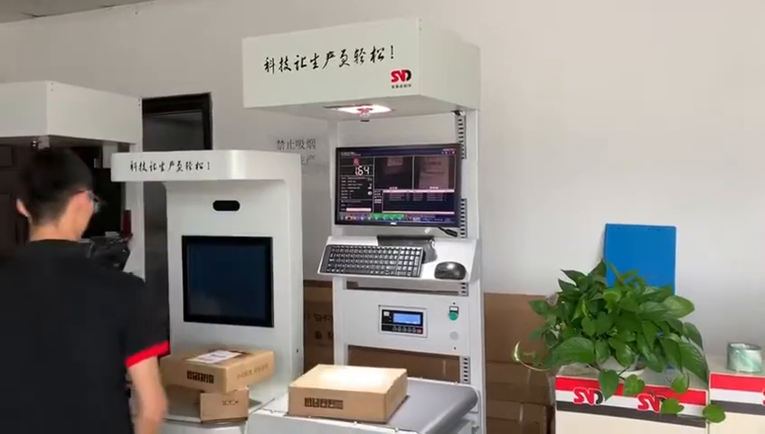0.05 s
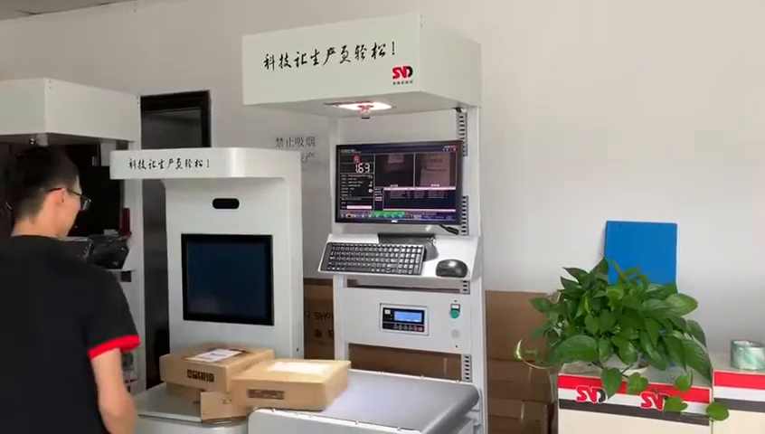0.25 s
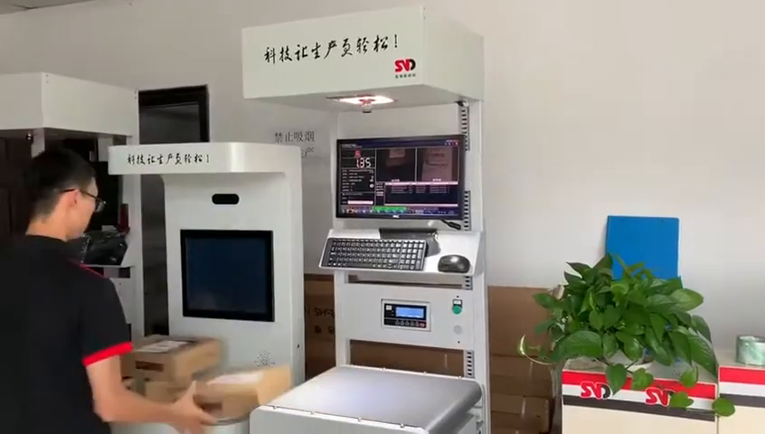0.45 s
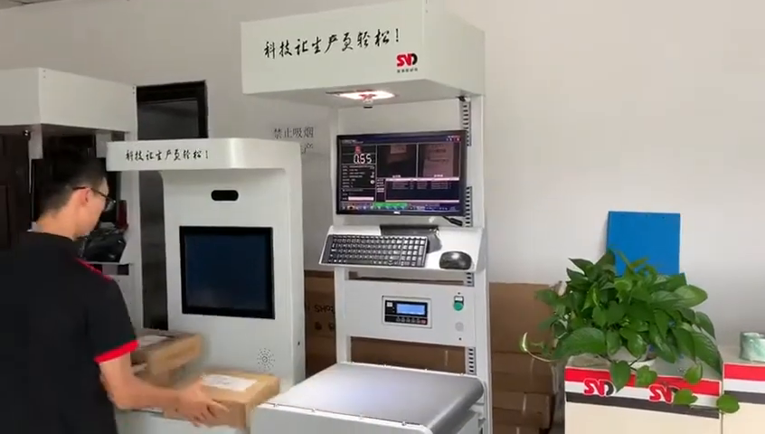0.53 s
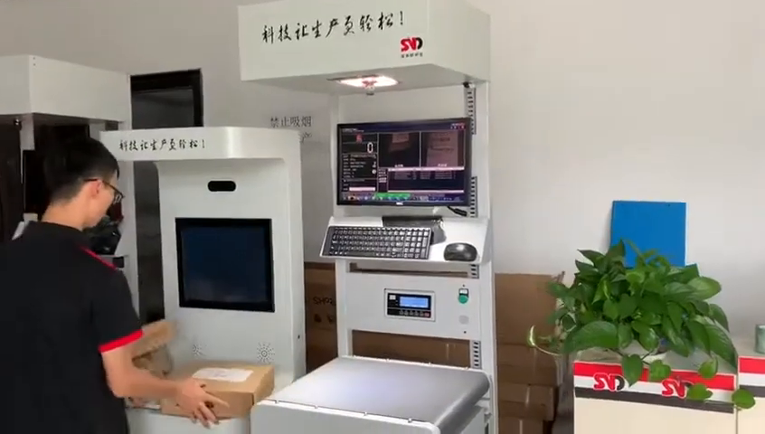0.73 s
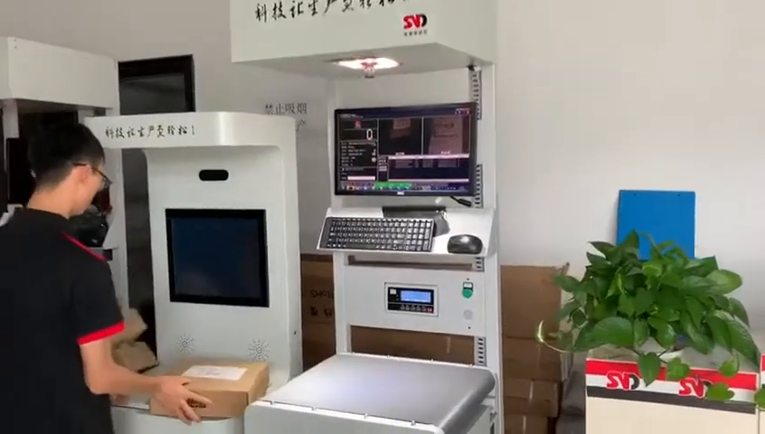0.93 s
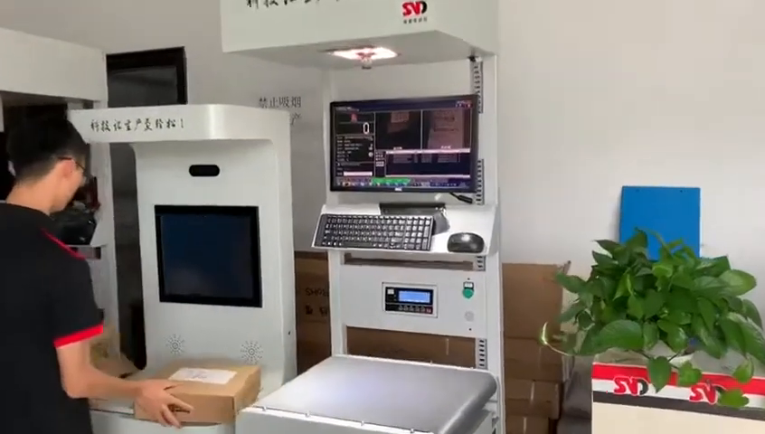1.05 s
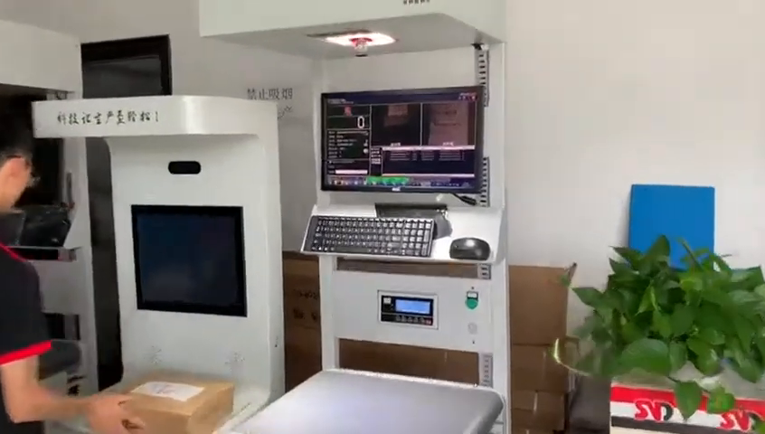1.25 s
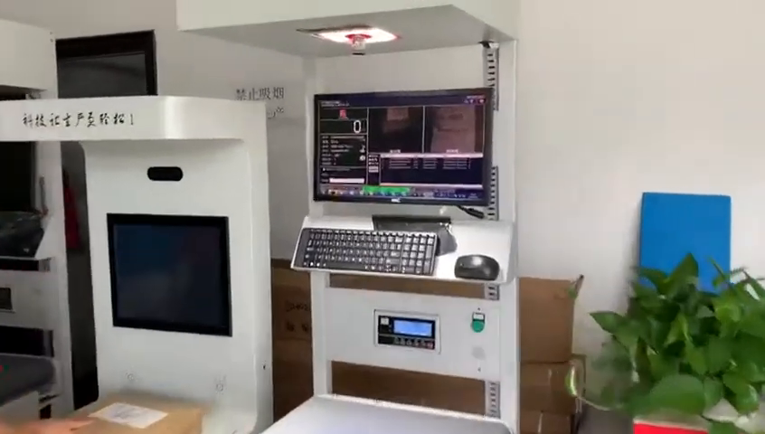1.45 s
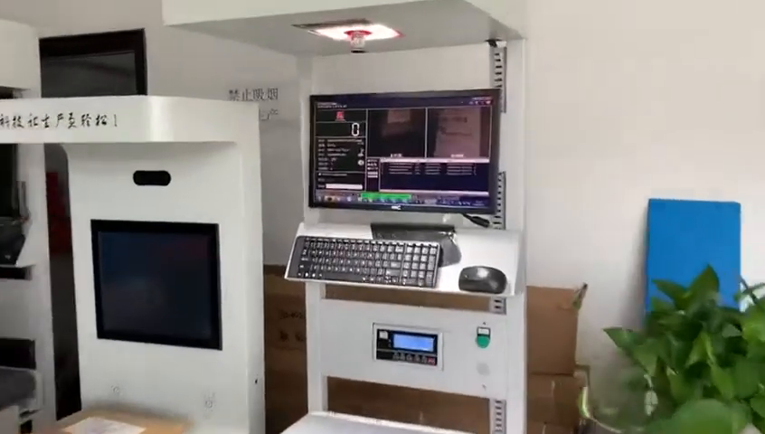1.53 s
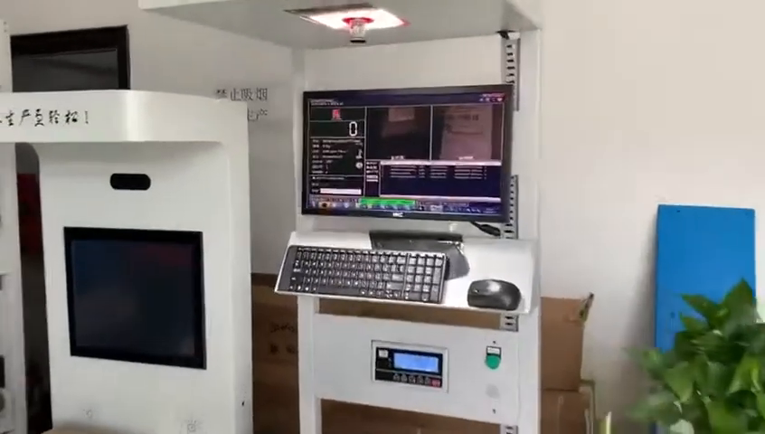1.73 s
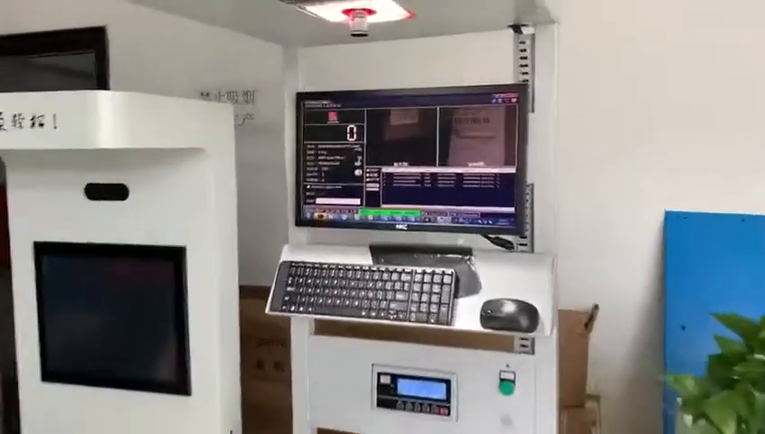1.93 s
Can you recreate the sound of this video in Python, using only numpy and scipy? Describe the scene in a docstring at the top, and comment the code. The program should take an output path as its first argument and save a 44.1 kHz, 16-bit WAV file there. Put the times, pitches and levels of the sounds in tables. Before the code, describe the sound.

A cardboard parcel tumbles off a conveyor into a pile, then boxes are bumped and slid.

```python
"""In a bare, echoing room, a cardboard parcel rubs along a short belt conveyor, tips off its end and
tumbles into a pile, setting a metal part ringing. Parcels are then picked up, bumped and slid about.
Each impact excites the damped modes of a box's panels and of the air behind them; friction makes a
grainy noise, and fibres and tape crackle. The steel cabinet rings in sympathy, and the machine hums low."""
import sys
import numpy as np
from scipy import signal
from scipy.io import wavfile
from scipy.ndimage import uniform_filter1d

SR = 44100
rng = np.random.default_rng(int(sys.argv[2]) if len(sys.argv) > 2 else 0)


def log_audio(samples):
    """Write samples as a 16-bit WAV file to the path given in sys.argv[1]."""
    # one column per channel
    frames = np.atleast_2d(samples).T
    # limit to full scale, then quantise
    limited = np.clip(frames, -1, 1)
    pcm = np.round(limited * 32767).astype(np.int16)
    wavfile.write(sys.argv[1], SR, pcm)


N = 88200
T = np.arange(N) / SR
BAND_HZ = 28 * 2 ** (np.arange(18) / 2)
# blows on cardboard: (time [s], hollow pitch [Hz], hollow level [dB], hollow t60 [s],
# thud [dB], knock [dB], clap [dB], crack [dB])
BLOWS = [(0.055, 918, -29.5, 0.052, -44, -69, -28, -38.5), (0.227, 256, -8, 0.036, -36, -41.5, -23, -35),
         (0.251, 854, -13, 0.086, -24.5, -16.5, -19, -33.5),
         (0.271, 240, -9.5, 0.043, -37, -30, -21.5, -49), (0.315, 308, -16.5, 0.11, -37, -26.5, -43, -45),
         (0.375, 1100, -12.5, 0.023, -36, -20, -14.5, -22.5),
         (0.389, 1128, -12, 0.14, -19.5, -15.5, -9.5, -21), (0.412, 763, -19, 0.075, -24, -18.5, -13, -20),
         (0.443, 299, -7.5, .06, -13, -15.5, -16.5, -14), (0.459, 442, -11, 0.1, -17, -16.5, -9.5, -36),
         (0.476, 215, -7, 0.14, -14.5, -16.5, -24, -20.5),
         (0.489, 171.6, -13, 0.15, -11, -10.5, -18, -18.5), (0.52, 323, -6, 0.039, -25, -28.5, -16.5, -22),
         (0.543, 268, -4.5, 0.076, -24.5, -27, -19.5, -26.5),
         (0.558, 743, -12.5, 0.074, -26, -18, -24, -25), (0.597, 283, -6.5, 0.063, -23.5, -26, -16.5, -37),
         (0.680, 743.5, -25.5, 0.38, -26, -37, -22, -43), (0.764, 237, -26, 0.05, -45, -32.5, -35, -43),
         (0.865, 176, -21, 0.096, -35, -37, -44, -62), (0.958, 231, -28, 0.056, -40.5, -38, -37, -54),
         (1.079, 391, -17.5, 0.063, -31, -16.5, -30, -30.5),
         (1.096, 410, -11, 0.15, -24, -11.5, -25.5, -29), (1.113, 350, -6, 0.055, -38, -37, -29, -31),
         (1.126, 340, -29, 0.085, -39, -27, -22, -60), (1.136, 703, -17, 0.057, -21.5, -20, -27, -32),
         (1.148, 384, -10, 0.062, -32, -14, -25, -42), (1.184, 248, -10.5, 0.073, -32, -34, -23, -64),
         (1.300, 415, -22.5, .05, -26, -25.5, -45, -41), (1.4245, 400.6, 3, 0.033, -20, -22, -23, -30.5),
         (1.456, 343, -12.5, 0.1, -39, -19, -27, -49), (1.477, 263, -18, 0.06, -48, -18.5, -34, -33),
         (1.516, 507, -9, 0.029, -24.5, -28, -23, -45), (1.532, 324, -14.5, 0.037, -22.5, -17, -21, -26),
         (1.566, 613, -15, 0.066, -33, -18, -30.5, -34.5), (1.592, 392, -18, 0.12, -20.5, -36, -52, -50),
         (1.787, 300, -27, 0.021, -34, -28, -45, -30), (1.795, 1147, -15, 0.053, -28, -25, -30, -30),
         (1.798, 211.5, -14, 0.087, -60, -19, -30, -34.5), (1.826, 680, -28.5, .1, -41, -38, -28.5, -46),
         (1.92, 360, -35, 0.076, -31, -28, -39, -63)]


def from_db(db):
    """Decibels to amplitude ratio."""
    return 10 ** (np.asarray(db) / 20)


def rms_one(x):
    """Normalisation to unit rms."""
    return x / np.sqrt(np.mean(x ** 2) + 1e-20)


def at_hz(points, hz):
    """Interpolation on a log-frequency axis."""
    f, value = np.transpose(points)
    return np.interp(np.log(hz), np.log(f), value)


def dying(t, t60):
    """Exponential decay, by 60 dB in t60 seconds."""
    return np.exp(-np.log(1000) * t / t60)


def drift(rate):
    """Random modulation of spread about 1, with rate new values a second."""
    return np.interp(T * rate, np.arange(4000), rng.standard_normal(4000))


def bandpass(x, order, low_hz, high_hz):
    """Butterworth band-pass filter."""
    return signal.sosfilt(signal.butter(order, [low_hz, high_hz], "band", fs=SR, output="sos"), x)


def noise_bands():
    """Uncorrelated half-octave noise bands of unit rms."""
    return [rms_one(bandpass(rng.standard_normal(N + SR // 4), 3, hz / 2 ** .25, hz * 2 ** .25)[-N:])
            for hz in BAND_HZ]


def even(x, hz):
    """Division by the running rms levels out the chance swells of a noise band."""
    power = uniform_filter1d(x * x, int(3 * SR / hz))
    return rms_one(x / np.sqrt(np.abs(power) + .05))


def strikes(times, gains):
    """An impulse train."""
    out = np.zeros(N)
    np.add.at(out, (np.asarray(times) * SR).astype(int), gains)
    return out


def lag(x, seconds):
    """Leaky integrator: a unit impulse decays exponentially from height 1."""
    return signal.lfilter([1], [1, -np.exp(-1 / (seconds * SR))], x + 1e-18)


def ring(x, hz, t60):
    """Damped oscillator: a unit impulse starts a sine of height 1."""
    r, w = dying(1 / SR, t60), 2 * np.pi * hz / SR
    return signal.lfilter([0, np.sin(w)], [1, -2 * r * np.cos(w), r * r], x + 1e-18)


def room(x):
    """Reverberation: a diffuse field builds up after a short gap and dies sooner in the treble."""
    # reverberation time: (frequency [Hz], t60 [s])
    decay_times = [(80, 1.54), (300, 0.78), (1200, 0.77), (4000, 0.45), (8000, 0.37)]
    # reverberant gain: (frequency [Hz], level [dB])
    levels = [(80, -8), (400, -3), (1200, -3.5), (4000, -3), (8000, -2)]
    gap_s, build_s = 0.0045, 0.0027
    response, t = 0, np.maximum(T - gap_s, 0)
    for hz, noise in zip(BAND_HZ, noise_bands()):
        tail = even(noise, hz) * dying(t, at_hz(decay_times, hz)) * (1 - np.exp(-t / build_s))
        spectrum_share = hz * (2 ** .25 - 2 ** -.25) / (SR / 2)
        response += rms_one(tail) * np.sqrt(spectrum_share / N) * from_db(at_hz(levels, hz))
    return signal.fftconvolve(x, response)[:N]


def machine():
    """Amplitude-modulated motor tones waver over the steady broadband noise of drive and fans."""
    # motor hum: (frequency [Hz], level [dB])
    tones = [(43, -48), (50, -50.5), (112, -52)]
    # rumble spectrum: (frequency [Hz], half-octave level [dB])
    rumble = [(28, -57), (45, -56.5), (80, -46), (160, -57.5), (350, -43), (700, -57), (1400, -54.5),
              (2800, -56.5), (5500, -67), (8500, -68)]
    hum = 0
    for hz, db in tones:
        waver = 1 + 0.9 * drift(11)
        hum += from_db(db) * waver * np.sqrt(2) * np.sin(2 * np.pi * (hz * T + rng.random()))
    return hum + sum(noise * from_db(at_hz(rumble, hz)) for hz, noise in zip(BAND_HZ, noise_bands()))


def cabinet(x):
    """Sympathetic resonance: sheet steel rings on after the blows."""
    # cabinet modes: (frequency [Hz], gain at resonance [dB], t60 [s])
    modes = [(228, -19.5, 1), (275.4, 2, 2), (372, -12.5, 0.31), (728, -6.5, 2.1), (1134, -11.5, 0.14),
             (1795, -14.5, 0.62)]
    return sum(from_db(db) * 2 * (1 - dying(1 / SR, t60)) * ring(x, hz, t60) for hz, db, t60 in modes)


def metal():
    """Beating of close modes, made as narrow-band noise: a loose metal part jangles at each jolt."""
    # jolts: (time [s], level [dB])
    jolts = [(0.02, -55.5), (0.111, -49), (0.248, -44.5), (0.389, -34.5), (0.446, -29), (0.46, -28),
             (0.515, -30), (0.581, -40)]
    # mode clusters: (centre [Hz], width [Hz], gain [dB], t60 [s])
    clusters = [(4740, 160, -6, 0.13), (6440, 61, -6.5, 0.59), (7950, 400, -0.5, 0.079)]
    times, jolt_db = np.transpose(jolts)
    out = 0
    for hz, width, db, t60 in clusters:
        cluster = rms_one(bandpass(rng.standard_normal(N), 1, hz - width / 2, hz + width / 2))
        energy = lag(strikes(times, from_db(jolt_db + db) ** 2), t60 / (2 * np.log(1000)))
        out += cluster * np.sqrt(energy)
    return out


def crackle(x):
    """Acoustic emission: fibres and tape tick at random, as strongly as x drives their band."""
    ticks_per_s, pitches, ring_cycles = 500, 24, 230
    spread_db, level_db = 4, -4
    follow_s = .004
    out, rate = 0, ticks_per_s / pitches
    for hz in np.geomspace(1800, 8800, pitches):
        band = bandpass(x, 2, hz * .9, hz * 1.1)
        drive = np.sqrt(lag(band ** 2, follow_s) / (follow_s * SR) / 3)
        sizes = from_db(spread_db * rng.standard_normal(N))
        ticks = sizes * (rng.random(N) < rate / SR)
        t60 = ring_cycles / hz
        unit_tick_power = rate * t60 / (4 * np.log(1000))
        out += ring(ticks * drive, hz, t60) / np.sqrt(unit_tick_power)
    return from_db(level_db) * out


def slides():
    """Sliding friction: cardboard makes grainy noise on the belt and on other boxes."""
    # strokes: (start [s], rise [s], hold [s], release [s], level [dB], rasp [dB], hiss [dB])
    strokes = [(0.016, 0.089, 0.13, 0.22, -32.5, 5.5, 3.5), (0.434, 0.038, .12, .17, -26.5, 8, -5.5),
               (1.118, 0.022, 0.082, 0.15, -33, -5.5, -5.5), (1.284, 0.055, 0.06, 0.062, -42, -1, 10),
               (1.502, .025, 0.051, 0.06, -26.5, 6, -2), (1.777, 0.017, 0.024, 0.097, -34.5, -9, 8.5)]
    # friction spectrum: (frequency [Hz], relative half-octave level [dB])
    spectrum = [(30, -29), (60, -22), (160, -2.5), (350, 7.5), (750, 3), (1300, 0.5), (2500, -9),
                (4200, -12), (5600, -13.5), (8000, -16.5)]
    # where the treble tilt is zero, rasp and hiss: (frequency [Hz])
    tilt_hz = [1300, 3200, 6500]
    grain_db = 2
    out, bands = 0, np.array(noise_bands())
    for start, rise, hold, release, db, rasp_db, hiss_db in strokes:
        tilt_db = np.interp(np.log(BAND_HZ), np.log(tilt_hz), [0, rasp_db, hiss_db])
        colour = from_db(at_hz(spectrum, BAND_HZ) + tilt_db)
        envelope = np.interp(T, start + np.cumsum([0, rise, hold, release]), [0, 1, 1, 0])
        out += from_db(db) * rms_one(colour @ bands) * envelope
    return out * from_db(-grain_db * drift(250))


def snaps():
    """Contact transients: a stiff corner or edge meets a hard surface with a short woody crack."""
    # contacts: (time [s], centre [Hz], level [dB])
    contacts = [(0.385, 2950, -19), (0.46, 1500, -11.5), (0.482, 2700, -31), (1.424, 3510, -21.5),
                (1.425, 1160, -13.5), (1.532, 3460, -28.5), (1.792, 2920, -29)]
    t60, width_octaves = 0.019, 0.6
    out, edge_ratio = 0, 2 ** (width_octaves / 2)
    for time, hz, db in contacts:
        noise = rms_one(bandpass(rng.standard_normal(N), 2, hz / edge_ratio, hz * edge_ratio))
        envelope = lag(strikes([time], from_db([db])), t60 / np.log(1000))
        out += even(noise, hz) * envelope
    return out


def hollows():
    """Cavity resonance: a struck face and the air behind it ring briefly, sagging from sharp to flat."""
    sag, sag_s, attack_s = 0.047, 0.019, .001
    out, t = np.zeros(N + SR), T[:SR // 3]
    bend = 1 + sag * (2 * np.exp(-t / sag_s) - 1)
    for time, hz, db, t60, *_ in BLOWS:
        start = int(time * SR)
        phase = 2 * np.pi * hz * np.cumsum(bend) / SR
        envelope = dying(t, t60) * (1 - np.exp(-t / attack_s))
        out[start:start + len(t)] += from_db(db) * np.sin(phase) * envelope
    return out[:N]


def panels():
    """Modal overlap: a struck box's many damped modes merge into noisy clatter; the lows last longest."""
    # where thud, knock, clap and crack lie: (frequency [Hz])
    blow_hz = [150, 420, 1200, 4000]
    # colour of the board: (frequency [Hz], half-octave gain [dB])
    spectrum = [(40, -25), (80, -16.5), (130, -7.5), (200, -5), (400, -3), (1100, -6.5), (1700, -10.5),
                (2500, -12.5), (4200, -16), (5500, -23.5), (8000, -15.5)]
    # panel damping: (frequency [Hz], t60 [s])
    decay_times = [(100, 0.25), (500, 0.13), (2000, 0.14), (8000, 0.071)]
    attack_s, grain_db = 0.0011, 2.5
    out, blows = 0, np.array(BLOWS)
    for hz, noise in zip(BAND_HZ, noise_bands()):
        blow_db = np.array([np.interp(np.log(hz), np.log(blow_hz), blow[4:]) for blow in blows])
        impulses = strikes(blows[:, 0], from_db(blow_db + at_hz(spectrum, hz)) ** 2)
        energy = lag(impulses, at_hz(decay_times, hz) / (2 * np.log(1000)))
        envelope = np.sqrt(lag(energy, attack_s) / (attack_s * SR))
        out += even(noise, hz) * envelope
    return out * from_db(grain_db * drift(500))


def scene():
    """Superposition of the parcels' direct sound, the cabinet, the reverberation and the machine."""
    boards = panels() + slides()
    hollow = hollows()
    clatter = boards + crackle(boards) + snaps() + metal()
    reverberation = room(clatter + from_db(-2) * hollow)
    direct = clatter + hollow
    return (direct + cabinet(direct) + reverberation + machine())[None]


def record(dry):
    """Soft saturation rounds the peaks and a steep low-pass filter cuts the top."""
    ceiling, cutoff_hz = 1.1, 9300
    rounded = ceiling * np.tanh(dry / ceiling)
    return signal.sosfilt(signal.ellip(10, .3, 80, cutoff_hz, fs=SR, output="sos"), rounded)


dry = scene()
out = record(dry)
log_audio(out)
```